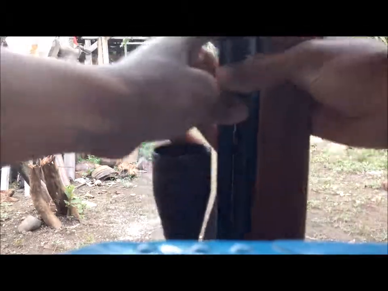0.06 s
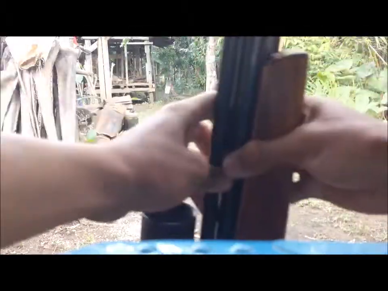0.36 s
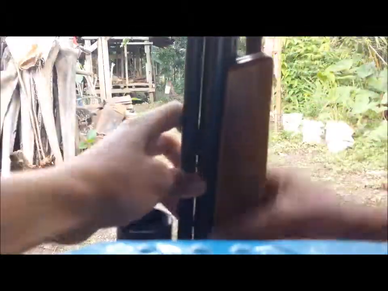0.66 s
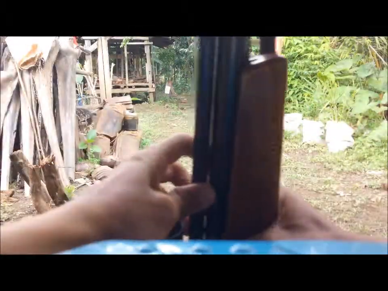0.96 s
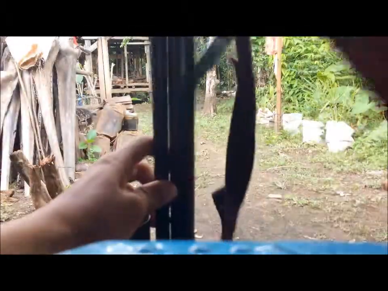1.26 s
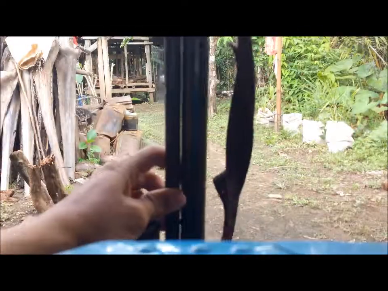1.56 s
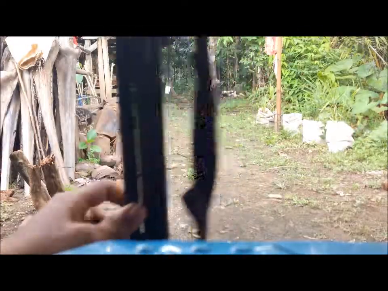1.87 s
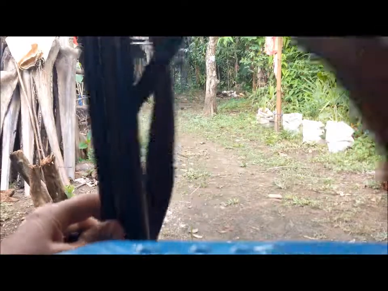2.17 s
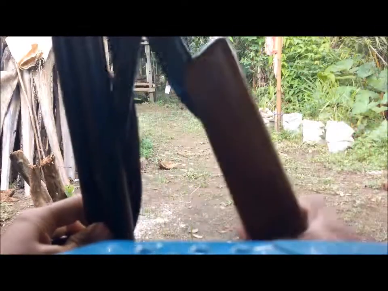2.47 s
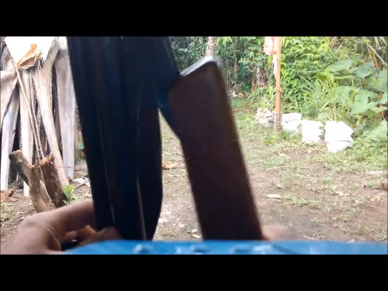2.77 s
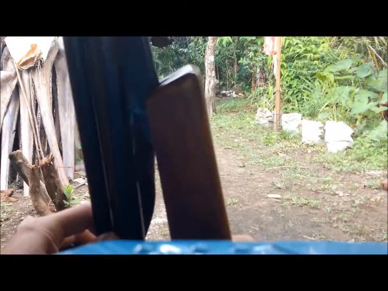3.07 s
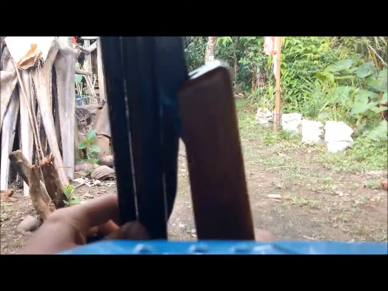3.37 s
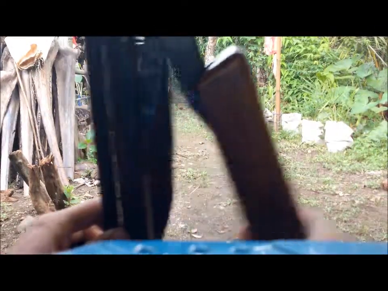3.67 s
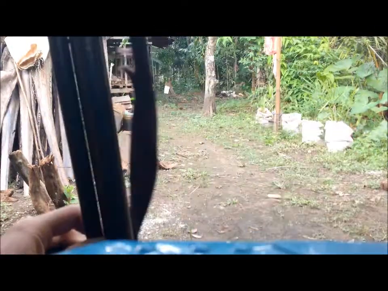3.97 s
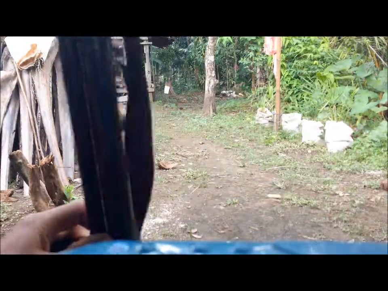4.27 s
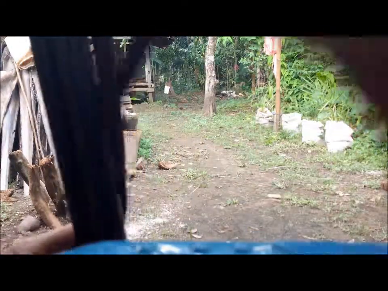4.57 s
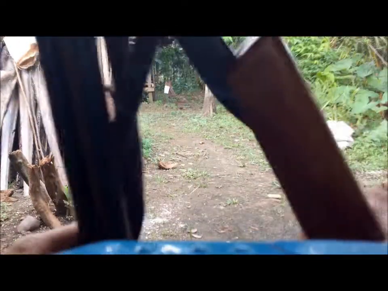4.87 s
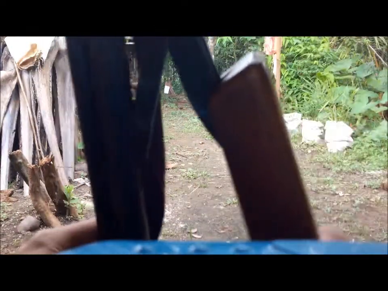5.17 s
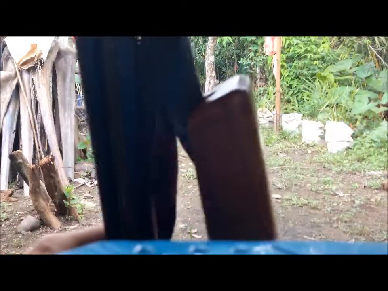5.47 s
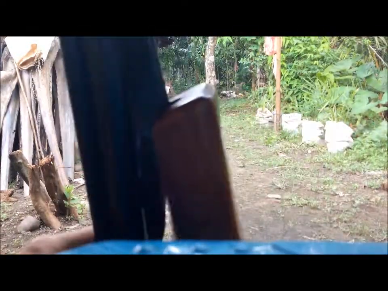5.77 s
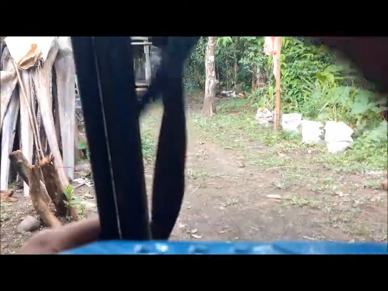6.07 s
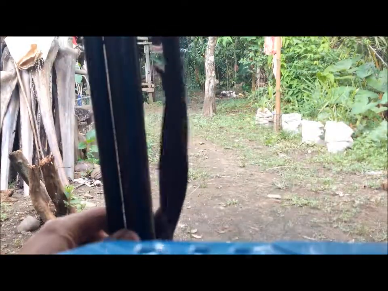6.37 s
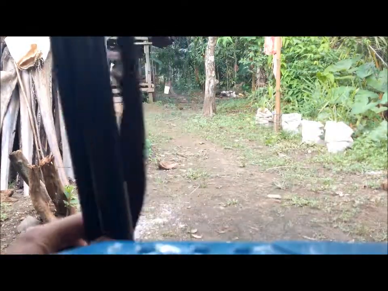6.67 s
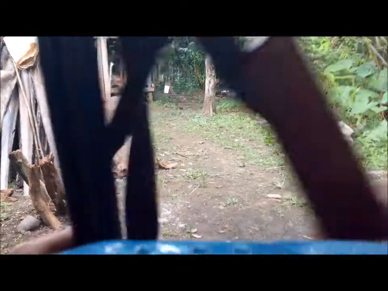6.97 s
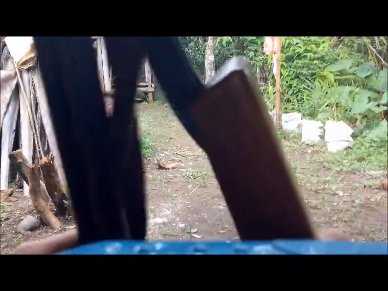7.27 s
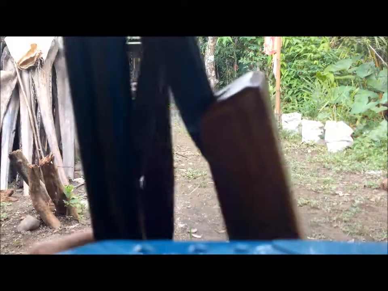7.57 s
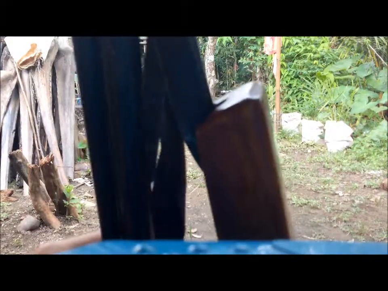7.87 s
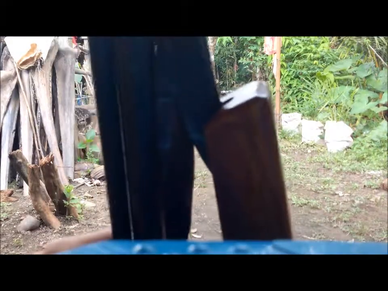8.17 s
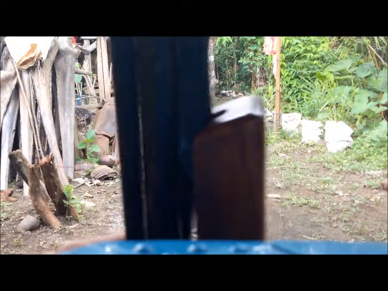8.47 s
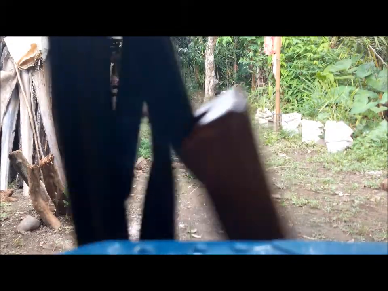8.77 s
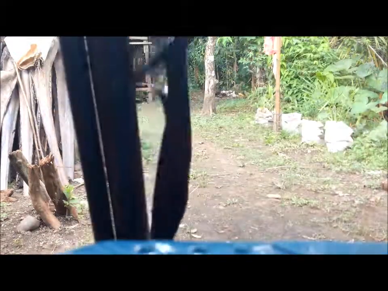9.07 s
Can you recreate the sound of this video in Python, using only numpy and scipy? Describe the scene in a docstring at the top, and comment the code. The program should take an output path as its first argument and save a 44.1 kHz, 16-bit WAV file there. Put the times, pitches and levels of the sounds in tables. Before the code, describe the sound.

A pump air rifle is worked four times, with short air hisses and sharp clacks over a faint, distant engine hum.

```python
"""Pumping an air rifle in a yard

A pump-up air rifle is worked by hand, close to the left microphone of a phone. Each time the lever
swings open, air rushes into the pump; on the way back the linkage creaks and the wooden grip claps shut.
Hands rub along the gun, and far off a slow engine revs up twice over the quiet rumble of the yard."""
import sys
import numpy as np
from scipy import signal
from scipy.fft import rfft, irfft
from scipy.io import wavfile

SR = 44100
rng = np.random.default_rng(int(sys.argv[2]) if len(sys.argv) > 2 else 0)


def int16_out(signal):
    """Quantize to a 16-bit WAV file."""
    q = np.round(np.clip(np.atleast_2d(signal).T, -1, 1) * 32767)
    wavfile.write(sys.argv[1], SR, q.astype(np.int16))


N = 411012
TIME = np.arange(N) / SR
FREQS = np.maximum(np.arange(N // 2 + 1) * SR / N, 1)

# background of the yard: f/Hz, relative level/dB
YARD_COLOUR = [(15, -69), (25, -15), (48, -18.5), (84, -1.5), (120, -3), (170, -9), (235, -10),
               (307, -16.5), (382, -21), (604, -28), (654, -30.5), (1360, -35), (1470, -34), (1780, -34),
               (2810, -36.5), (3130, -33), (6850, -44), (11700, -36), (15800, -35)]
# how alike it is at the two microphones: f/Hz, correlation
YARD_LIKENESS = [(130, 1), (290, 0.74), (1400, 0.54), (3100, 0.1), (6800, -0.88), (15000, -0.32)]
# the side it leans to: f/Hz, left minus right/dB
YARD_BALANCE = [(170, -1.5), (300, 5), (1300, 2.5), (4400, -2), (15000, 0)]
# revs of the far engine: throttle opens/s, closes/s, top firing rate/Hz, run-up/s
REVS = [(-.1, 1.7, 26.97, .45), (5.82, 7.6, 26.32, .27)]
# its hum, one list for each rev: t/s, relative level/dB
REV_LEVELS = [
    [(0.0, -56.5), (0.26, -47.5), (0.71, -52.5), (0.75, -46), (0.82, -45), (1.05, -52), (1.3, -45),
     (1.39, -54), (1.45, -43.5), (2.35, -60)],
    [(4.8, -60.5), (5.97, -57.5), (6.12, -45), (6.23, -56.5), (6.41, -45), (6.82, -57.5), (7.41, -46.5),
     (7.85, -58), (7.94, -51.5), (8.25, -61)],
]
# its exhaust from a distance: f/Hz, relative level/dB
EXHAUST_COLOUR = [(50, -13), (80, -46), (104, -3.5), (132, 0), (163, -0.5), (185, -13.5), (235, -17),
                  (290, -20), (350, -22), (600, -26.5), (1200, -53)]
# skin on wood and steel: f/Hz, relative level/dB
SKIN_COLOUR = [(1000, -39), (2200, -7), (3000, -6.5), (3500, -8), (4200, -3), (5600, -3), (6400, -2),
               (7300, -3), (8500, -19), (12000, -2), (15000, -35)]
# scuffs as the grip changes: t/s, relative level/dB
SCUFFS = [(0.0, -61), (.78, -54.5), (3.458, -63), (5.7, -64.5), (8.12, -63.5), (8.45, -61)]
# modes of the rifle: f/Hz, t60/s, relative level/dB
RIFLE_MODES = [(514, 0.02, -24), (1505, 0.0099, -11), (2350, 0.0034, 2), (2983, 0.0088, -2.5),
               (3390, 0.0067, -4), (4140, .012, 4.5), (4530, 0.0059, 0), (5090, 0.011, -1.5),
               (5990, 0.011, -2), (6576, 0.0097, 2), (7240, 0.0089, -7), (7720, 0.02, -10),
               (9370, 0.021, -19.5), (12500, .003, -53)]
# knocks of lever and action: t/s, level/dB, wooden lows/dB, steel highs/dB, chatter/ms, favoured ring/Hz
KNOCKS = [(0.742, -48, 1, 3, 3.1, 6070), (0.752, -37.5, 5, 9, 11, 5970), (0.7641, -41.5, 12, -3, 5.9, 4100),
          (0.7688, -34, 5, 0, 2.6, 5100), (.953, -33.5, -3, 9, 4.4, 2950), (1.189, -52, -6, 7, 2.3, 6060),
          (1.312, -34.5, 1, -13, 9.3, 2940), (1.877, -25.5, -12, 1, 7.6, 4680),
          (3.282, -53.5, 7, 10, 3.1, 5100), (3.4882, -28, -3.5, -7, 3.3, 1470),
          (3.662, -53, -3, 4, 7, 2900), (3.685, -49, -5, 6, 5.1, 2900), (5.7317, -23, 2.5, -2, 2.4, 2930),
          (6.446, -49.5, 1, 10, 3.9, 6600), (8.428, -35.5, 11, 16, 4.9, 6500),
          (8.6608, -25.5, 8, 4, 3.1, 3000)]
# creaks of the loaded pivot: t/s, length/s, level/dB, growth over the creak/dB, f/Hz
CREAKS = [(0.802, 0.016, -46, 13, 1914), (2.581, .05, -72, 0, 1715), (3.303, 0.024, -64.5, 1, 1704),
          (5.264, 0.035, -62, -13, 1680), (5.487, 0.06, -56.2, -4, 1703), (8.1, 0.052, -52, -12, 1680),
          (8.407, 0.041, -43.5, 14.5, 1660)]
# harmonics of the pivot: multiple, relative level/dB
PIVOT_HARMONICS = [(1, -2), (2, -16.5), (3, -19), (4, -19)]
# whistles of the piston seal: t/s, length/s, level/dB, f/Hz
WHISTLES = [(1.136, 0.049, -60, 6850), (2.229, .13, -54, 7250), (3.947, 0.1, -63.5, 6250)]
# opening strokes: inlet opens/s, rush length/s, full rush/dB, swell/dB, valve click/dB, relative slide/dB
STROKES = [(1.244, 0.062, -24, 15, -49.5, -64), (3.818, 0.058, -24, 12, -33, -63),
           (6.072, 0.047, -25.3, 4, -44, -64), (9.016, 0.047, -24, 8, -41, -68)]
# air jet at the inlet: f/Hz, relative level/dB
JET_COLOUR = [(300, -37.5), (1000, -38), (1700, -35), (2600, -21), (4000, -13.5), (5200, -7), (6700, -1),
              (7900, -6), (10200, -12.5), (11300, -8), (12700, -5.5), (15800, -11)]
# narrow peaks and dips of the pump tube: f/Hz, width/Hz, gain/dB
TUBE_RESONANCES = [(3700, 200, -1.5), (5520, 65, 7.5), (6360, 90, 4), (6780, 250, 2.5), (11530, 220, 7.5),
                   (11860, 120, -7)]
# soft bumps against the table: t/s, level/dB, f/Hz, length/s
BUMPS = [(3.398, -48, 109, 0.045), (3.432, -41, 116, 0.031)]
# shading of the right microphone, which faces away from the rifle: f/Hz, gain/dB, phase lag/rad
FAR_MIC = [(500, -3, 0), (1600, -5, 0), (2600, -10.5, 0), (3700, -17, .5), (4700, -24, 1.9),
           (6000, -15, 2.9), (7300, -8.5, 3.1), (8700, -9.5, 3.1), (10600, -19, 3.5), (12000, -13, 3.1),
           (15500, -15, 3.3)]

LEAD = SR // 64  # samples of scraping before the parts meet


def undb(db):
    """Decibels to gain."""
    return np.exp(np.asarray(db) * (np.log(10) / 20))


def unit(x):
    """Scale to rms 1."""
    return x / np.sqrt(np.mean(x ** 2))


def spectrum(table, column=1):
    """One column of a frequency table, joined on a log-frequency axis."""
    rows = np.array(table, float)
    return np.interp(np.log(FREQS), np.log(rows[:, 0]), rows[:, column])


def colour(x, table):
    """Filter x by rows of f/Hz, level/dB, and scale to rms 1."""
    return unit(irfft(rfft(x) * undb(spectrum(table)), N))


def walk(rate, size=N):
    """Random wander with a spread near 1 and `rate` new values a second."""
    steps = np.arange(size) * rate / SR
    return 1.21 * np.interp(steps, np.arange(4000), rng.standard_normal(4000))


def add(track, start, sound):
    """Mix a sound into the track at a time in seconds."""
    i = max(int(start * SR), 0)
    track[i:i + len(sound)] += sound[:N - i]


def arch(length):
    """A time axis, and a smooth swell and fall along it."""
    t = np.arange(int(length * SR)) / SR
    return t, np.sin(np.pi * t / length)


def yard(level_db=-58.5, flicker_db=0.25):
    """Low outdoor rumble, alike at both microphones, under a thin steady hiss."""
    likeness = np.clip(spectrum(YARD_LIKENESS), -.99, .99)
    mid, side = (rfft(rng.standard_normal(N)) * undb(spectrum(YARD_COLOUR)) for _ in range(2))
    side *= np.sqrt((1 - likeness) / (1 + likeness))
    lean = undb(spectrum(YARD_BALANCE) / 2)
    pair = irfft(np.array([(mid + side) * lean, (mid - side) / lean]), N)
    return pair / pair.mean(axis=0).std() * undb(level_db + flicker_db * walk(1.983))


def firing_rate(idle_hz=20.51, hunt_hz=.6, coast_s=.65):
    """The engine runs up from an unsteady idle while the throttle is open, then coasts back down."""
    rate = idle_hz + hunt_hz * walk(3)
    for opens, closes, top_hz, run_up_s in REVS:
        rise = 1 - np.exp(-np.maximum(TIME - opens, 0) / run_up_s)
        coast = np.exp(-(np.maximum(TIME - closes, 0) / coast_s) ** 2)
        rate += (top_hz - rate) * rise * coast
    return rate


def hum_level(idle_db=-66, settle_s=0.39, wander_db=1):
    """Relative level in dB: the hum is loud around each rev and settles to a quiet idle."""
    rows = []
    for rev in REV_LEVELS:
        rows += [(rev[0][0] - settle_s, idle_db), *rev, (rev[-1][0] + settle_s, idle_db)]
    return np.interp(TIME, *np.transpose(rows)) + wander_db * walk(7)


def engine(flutter_db=3.5, rumble_db=-11, smear_rad=0.32, trim_db=0.66):
    """Harmonics of slow firings, far off; echoes on the way scatter their phases into a wavering hum."""
    rate = firing_rate()
    gain = undb(hum_level() + trim_db)
    phase = 2 * np.pi * np.cumsum(rate) / SR
    hum = np.zeros(N)
    for k in range(4, 13):
        harmonic_db = np.interp(k * rate, *np.transpose(EXHAUST_COLOUR)) + flutter_db * walk(6)
        scatter = rng.uniform(0, 2 * np.pi) + smear_rad * walk(5.4)
        hum += undb(harmonic_db) * np.sin(k * phase + scatter)
    rumble = undb(rumble_db) * colour(rng.standard_normal(N), EXHAUST_COLOUR)
    return gain * unit(unit(hum) + rumble)


def friction(rest_db=-70, slide_s=.38, swing_s=.7, swing_db=-5.5, attack_s=.03, release_s=0.058):
    """Relative strength of the rubbing: resting hands, the pump strokes and changes of grip."""
    power = np.full(N, undb(rest_db) ** 2)
    # the linkage slides before the inlet opens, and more lightly while the lever swings on out
    for start, *_, slide_db in STROKES:
        add(power, start - slide_s, (undb(slide_db) * arch(slide_s)[1]) ** 2)
        add(power, start, (undb(slide_db + swing_db) * arch(swing_s)[1]) ** 2)
    t = TIME[:SR] - .5
    scuff = np.exp(-np.maximum(-t / attack_s, t / release_s))
    for peak, level_db in SCUFFS:
        add(power, peak + t[0], (undb(level_db) * scuff[peak + t >= 0]) ** 2)
    return np.sqrt(power)


def rubbing(grip_db=1.74, grain_db=1.5, patch_db=3, half_width_hz=450, trim_db=1.5):
    """Skin drags over wood and steel in tiny catches; as the contact moves, band after band sings."""
    catches = rfft(rng.standard_normal(N) * undb(grain_db * walk(400)))
    centres_hz = np.arange(2400, 7700, 580)
    bands = np.exp(-((FREQS - centres_hz[:, None]) / half_width_hz) ** 4)
    outside_bands = np.clip(1 - bands.sum(axis=0), 0, 1)
    scrape = irfft(catches * outside_bands, N)
    for band in bands:
        scrape += irfft(catches * band, N) * undb(patch_db * walk(11))
    return colour(scrape, SKIN_COLOUR) * friction() * undb(trim_db + grip_db * walk(25))


def rifle_ring(mode_gain_db, linger_db=-36, linger_t60=0.13, detune=0.0068):
    """The rifle rings: the hands kill most of it at once, a little lingers in the barrel."""
    t = TIME[:SR // 8]
    hz, t60, db = np.transpose(RIFLE_MODES)
    hz = hz * (1 + detune * rng.standard_normal(len(hz)))  # the grip shifts the pitches a little
    decay = undb(-60 * t / t60[:, None]) + undb(linger_db - 60 * t / linger_t60)
    modes = decay * np.cos(2 * np.pi * hz[:, None] * t)
    signs = (-1) ** np.arange(len(hz))
    return (signs * undb(db + mode_gain_db)) @ modes


def knock(level_db, low_db, high_db, chatter_ms, ring_hz,
          chatter_db=-0.5, favour_db=5, scrape_db=-21, scrape_s=0.0076):
    """Parts scrape together, meet and chatter briefly; the place of contact favours one ring."""
    t = TIME[:SR // 8] - LEAD / SR
    chatter, scrape = rng.standard_normal((2, len(t)))
    chatter *= (t >= 0) * np.exp(-(t * 1000 / (1.5 * chatter_ms)) ** 2)
    scrape *= np.exp(-abs(t) / scrape_s)
    force = undb(chatter_db) * chatter / np.linalg.norm(chatter)
    force += undb(scrape_db) * scrape / np.linalg.norm(scrape)
    force[LEAD] += 1  # the blow itself
    hz = np.transpose(RIFLE_MODES)[0]
    tilt_db = np.interp(hz, [1600, 4000, 6000], [low_db, 0, high_db])
    ring = rifle_ring(tilt_db + favour_db * np.exp(-((hz - ring_hz) / 300) ** 2))
    soften = signal.butter(2, [450, 9000], "band", fs=SR, output="sos")
    sound = signal.sosfilt(soften, signal.fftconvolve(force, ring)[:len(t)])
    # the level is the knock's energy spread over 5 ms
    return undb(level_db) * sound * np.sqrt(SR / 200) / np.linalg.norm(sound)


def ticks(count=30, over_db=4.0, scatter_db=6.0):
    """Loose parts tick at random, more often and louder the harder the gun is rubbed."""
    out, strength = np.zeros(N), friction()
    energy_share = np.cumsum(strength ** 2) / np.sum(strength ** 2)
    for k, (when, size, ring) in enumerate(rng.random((count, 3))):
        i = np.searchsorted(energy_share, (k + when) / count)
        relative_db = over_db + scatter_db * np.log(size + 1e-9)
        tick = knock(relative_db, low_db=-2, high_db=13, chatter_ms=5.0, ring_hz=2900 + 3700 * ring)
        add(out, (i - LEAD) / SR, strength[i] * tick)
    return out


def knocks():
    """Lever and action knock together, and the valve clicks as each intake begins."""
    out = np.zeros(N)
    for start, *blow in KNOCKS:
        add(out, start - LEAD / SR, knock(*blow))
    for start, _, _, _, valve_db, _ in STROKES:
        add(out, start - LEAD / SR, knock(valve_db, low_db=-8, high_db=2, chatter_ms=4.5, ring_hz=2900))
    return out


def creaks(slip_s=0.0148, waver=0.045, rough_db=5.5, sag=0.049, rasp_db=-10, stick_db=-12, edge_s=0.0042):
    """The dry pivot sticks and slips in a run of short, raspy chirps that sag in pitch."""
    out = np.zeros(N)
    grit = colour(rng.standard_normal(N), [(600, -40), (1600, 0), (2800, -21), (6800, -7), (9000, -25)])
    for start, length, level_db, growth_db, hz in CREAKS:
        t = TIME[:int(length * SR)]
        edges = np.minimum(np.minimum(t, length - t) / edge_s, 1)
        slips = edges * undb(growth_db * t / length + stick_db * np.cos(np.pi * t / slip_s) ** 2)
        pitch = hz * (1 + waver * walk(682, len(t)) + sag * (.5 - t / t[-1]))
        phase = 2 * np.pi * np.cumsum(pitch) / SR
        tone = sum(undb(db + rough_db * walk(441, len(t))) * np.sin(k * phase)
                   for k, db in PIVOT_HARMONICS)
        rasp = undb(rasp_db) * grit[int(start * SR):][:len(t)] * (1 + np.sin(phase))
        add(out, start, undb(level_db) * unit((tone + rasp) * slips))
    return out


def seal_whistles(width_hz=420, fade_db=-14):
    """Air and rubber sing in a narrow, unsteady band that fades as the piston slides."""
    out = np.zeros(N)
    for start, length, level_db, hz in WHISTLES:
        t, swell = arch(length)
        band = signal.butter(2, [hz - width_hz / 2, hz + width_hz / 2], "band", fs=SR, output="sos")
        whistle = signal.sosfilt(band, rng.standard_normal(len(t)))
        envelope = np.sqrt(swell) * undb(fade_db * t / length)
        add(out, start, undb(level_db) * unit(whistle * envelope))
    return out


def intakes(open_s=0.0011, close_s=0.0083, flutter_db=1.4, roar_db=-23, leak_db=-23, leak_s=0.018):
    """The piston uncovers the inlet: a jet leaks, swells as the hole widens, dies as the pump fills."""
    flow, t = np.zeros(N), TIME[:SR // 5] - .03
    for start, length, level_db, swell_db, _, _ in STROKES:
        opening = .5 + .5 * np.tanh(t / open_s / 2)
        leak = undb(leak_db) * np.exp(-abs(t) / leak_s)
        swell = undb(-swell_db * np.clip(1 - t / length, 0, 1) ** 2.1)
        dying = np.exp(-np.maximum(t - length, 0) / close_s)
        add(flow, start + t[0], undb(level_db) * (opening + leak) * swell * dying)
    tube_db = sum(db / (1 + (2 * (FREQS - hz) / width) ** 2) for hz, width, db in TUBE_RESONANCES)
    hiss = irfft(rfft(rng.standard_normal(N)) * undb(tube_db), N)
    jet = colour(hiss, JET_COLOUR) * undb(flutter_db * walk(300))
    # the wide-open hole adds a lower roar
    roar = colour(rng.standard_normal(N), [(500, -30), (1500, 1), (3000, 3), (6000, 2.0)])
    return flow * (jet + undb(roar_db) * roar * flow / flow.max())


def bumps(overtone_db=-14, overtone_ratio=1.63):
    """The butt nudges the table: a few low swings each time, with a weaker overtone."""
    out = np.zeros(N)
    for start, level_db, hz, length in BUMPS:
        t, swell = arch(length)
        phase = 2 * np.pi * hz * t
        tone = np.sin(phase) + undb(overtone_db) * np.sin(overtone_ratio * phase)
        add(out, start, undb(level_db) * unit(swell ** 3 * tone))
    return out


def reflections(x, gain_db, t60, delay_s):
    """Scattered echoes reaching a microphone from one direction, thinner in the top treble."""
    t = TIME[:SR // 2]
    tail = rng.standard_normal(len(t)) * undb(-60 * t / t60) * (t > delay_s)
    tail = signal.lfilter([.7], [1, -.3], tail / np.linalg.norm(tail))
    return undb(gain_db) * signal.fftconvolve(x, tail)[:N]


def scene(right_echo_db=-4, lows_left_db=1.4):
    """The rifle is close to the left microphone; table and walls answer it; the engine is far away."""
    rifle = knocks() + intakes() + creaks() + seal_whistles() + rubbing() + ticks()
    table = [reflections(rifle, gain_db=-16.5, t60=.055, delay_s=.006) for _ in range(2)]
    walls = [reflections(rifle, gain_db=-17, t60=0.22, delay_s=.008) for _ in range(2)]
    left = rifle + table[0] + walls[0]
    shading = undb(spectrum(FAR_MIC)) * np.exp(-1j * spectrum(FAR_MIC, column=2))
    right = irfft(rfft(left) * shading, N) + undb(right_echo_db) * (table[1] + walls[1])
    pan = undb(np.array([[1], [-1]]) * lows_left_db / 2)
    lows = (bumps() + engine()) * pan
    return np.array([left, right]) + lows + yard()


def record(dry):
    """The phone cuts the top treble."""
    lowpass = signal.ellip(10, .1, 60, 15850, fs=SR, output="sos")
    return signal.sosfiltfilt(lowpass, dry)


dry = scene()
out = record(dry)
int16_out(out)
```